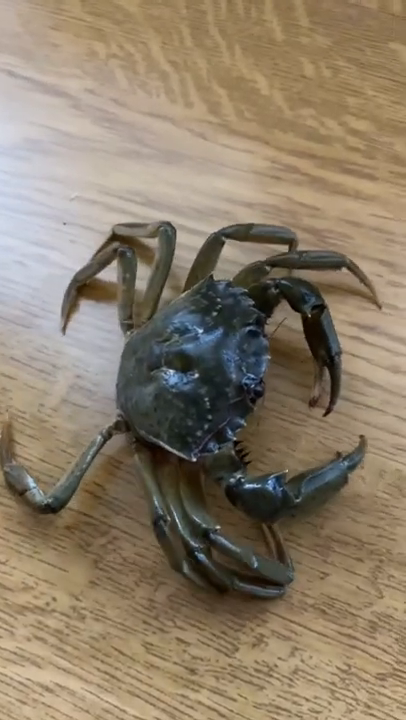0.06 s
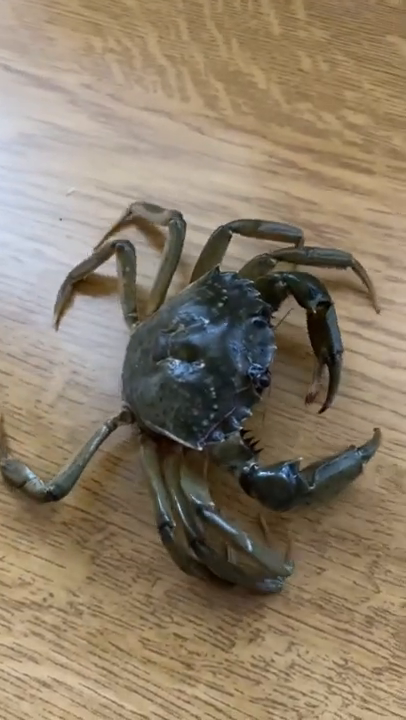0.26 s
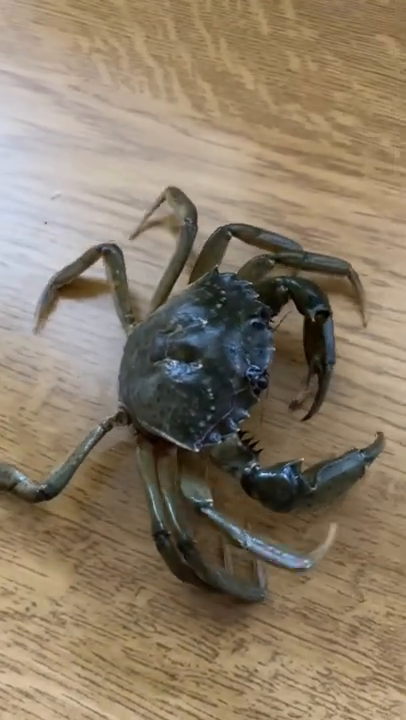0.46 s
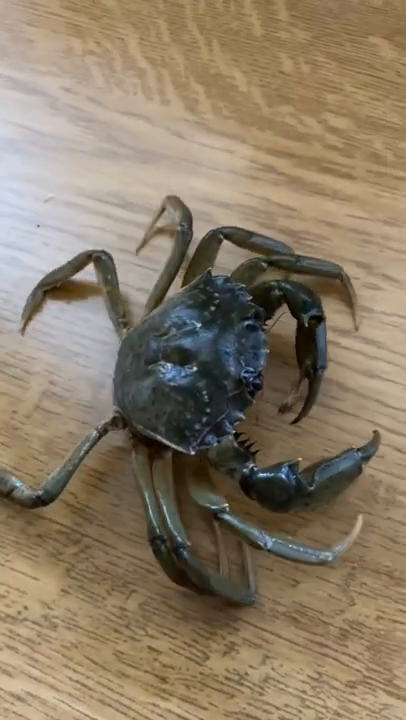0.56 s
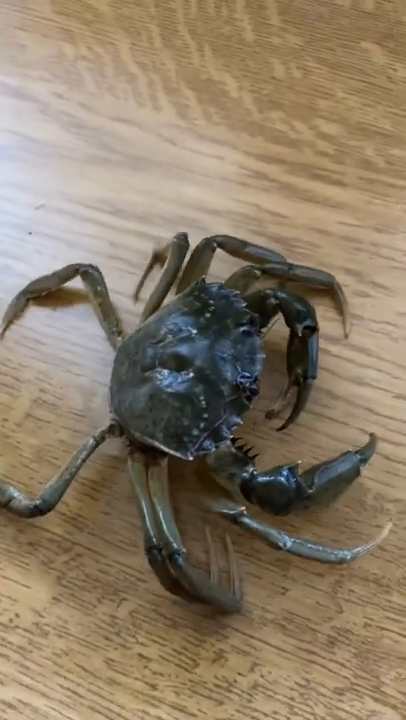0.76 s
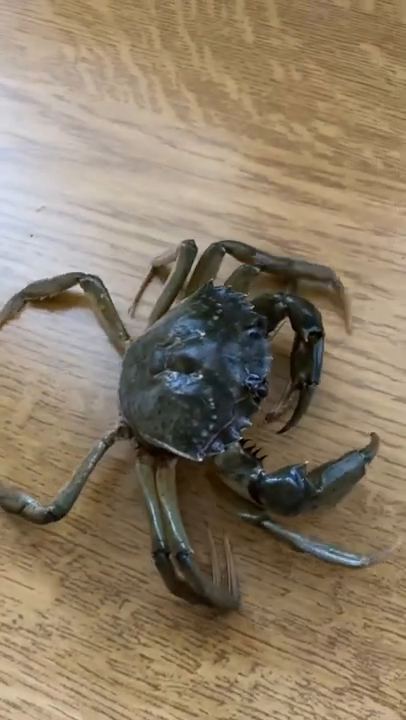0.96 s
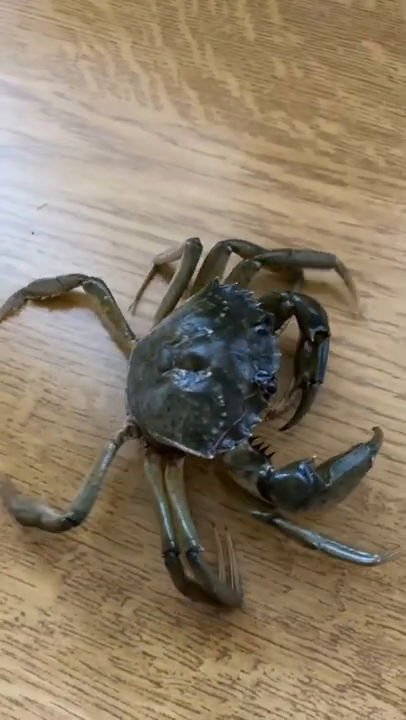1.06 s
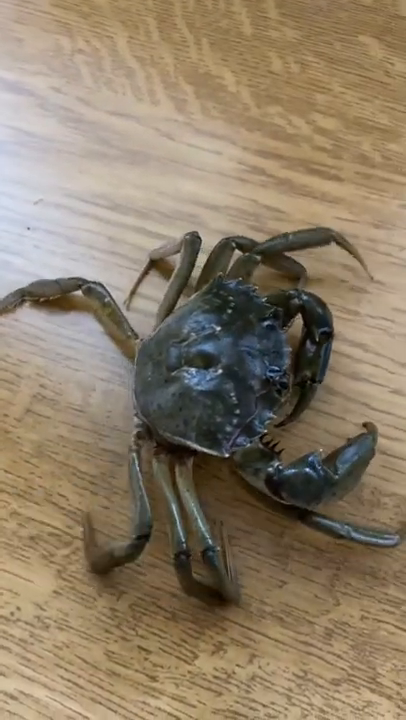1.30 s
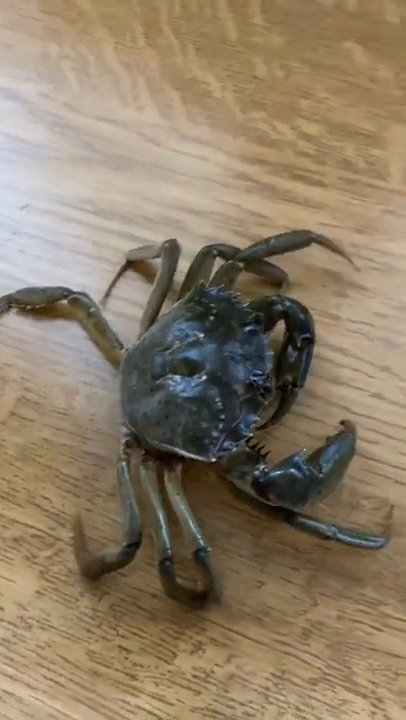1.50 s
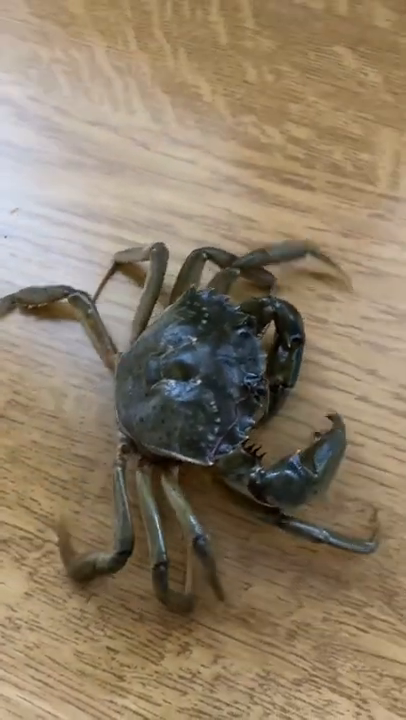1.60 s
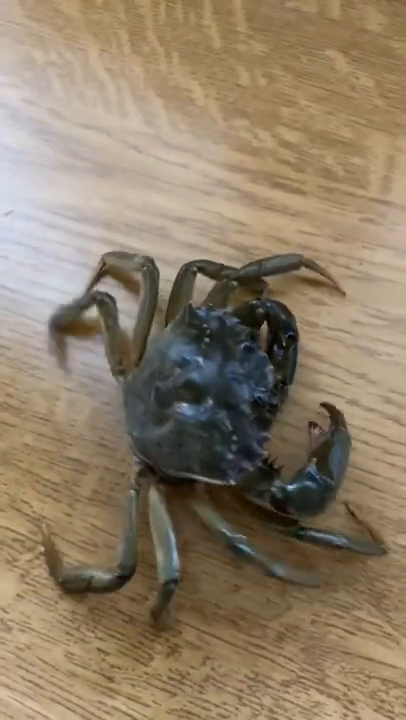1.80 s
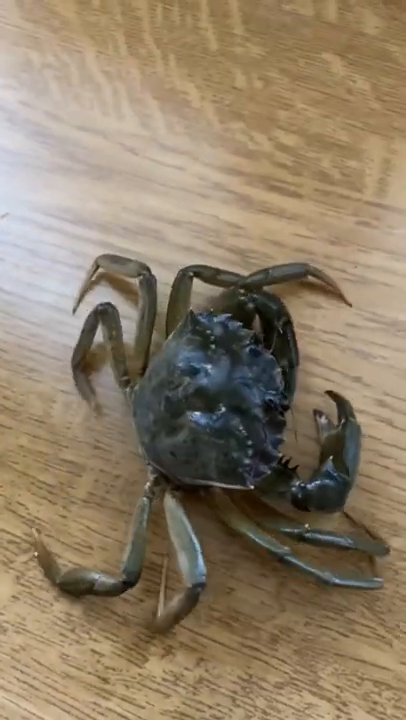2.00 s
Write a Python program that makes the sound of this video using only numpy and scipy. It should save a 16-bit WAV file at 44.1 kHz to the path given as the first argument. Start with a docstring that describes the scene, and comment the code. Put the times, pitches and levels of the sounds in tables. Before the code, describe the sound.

A crab's legs scrape over a wooden table, then brush lightly with soft knocks.

```python
"""One long scrape, swelling twice: a crab drags its legs over a wooden table, close by, in a quiet room.
Dense tiny slips rasp on the grain and set the board booming; the sharp leg tips scratch and hiss.
The body knocks softly and the board shudders under its weight. Then single legs brush and skid
over a faint rustle, with a few more knocks and two tiny shell clicks. A low room drone runs throughout."""
import sys
import numpy as np
from scipy import signal
from scipy.fft import rfft, irfft
from scipy.io import wavfile

SR = 44100
rng = np.random.default_rng(int(sys.argv[2]) if len(sys.argv) > 2 else 0)


def materialize(psi):
    """Save the field psi as 16-bit PCM at rate SR to the path in sys.argv[1].

    A 1-D psi becomes a single channel; in a 2-D psi each row is a channel.
    """
    bounded = np.clip(np.atleast_2d(psi).T, -1, 1)
    quanta = np.round(bounded * 32767).astype(np.int16)
    wavfile.write(sys.argv[1], SR, quanta)


N = 90404
T = np.arange(N) / SR
HZ = np.maximum(np.arange(N // 2 + 1) * SR / N, 1)
SIDE = np.array([[.5], [-.5]])  # left, right

# envelopes of board boom, grain rasp, tip scratch, tip hiss, leg rustle: t/s, level/dB
BOOM_ENVELOPE = [(0.0, -49.5), (0.042, -56.5), (0.066, -68), (0.152, -43), (0.202, -53.5), (0.236, -36),
                 (0.286, -36.5), (0.31, -55.5), (0.388, -41.5), (0.414, -35.5), (0.5, -26.5), (0.536, -29),
                 (0.56, -36), (0.654, -47.5), (0.674, -52.5), (0.726, -48), (0.808, -54.5), (0.85, -95)]
RASP_ENVELOPE = [(0.0, -51), (0.084, -57), (0.136, -48.5), (0.22, -48), (0.236, -40), (0.322, -43),
                 (0.396, -40), (0.444, -28.5), (0.464, -31.5), (0.494, -29.5), (0.586, -38.5),
                 (0.626, -50.5), (0.762, -56.5), (0.832, -72)]
SCRATCH_ENVELOPE = [(0.0, -53.5), (0.082, -61.5), (0.126, -44.5), (0.186, -49), (0.226, -44.5),
                    (0.422, -39), (0.444, -35.5), (0.46, -42.5), (0.5, -30), (0.608, -56), (0.646, -47),
                    (0.686, -58), (0.762, -63), (0.85, -81)]
HISS_ENVELOPE = [(0.0, -61.5), (0.074, -66.5), (0.124, -49.5), (0.216, -47.5), (0.242, -42), (0.474, -45.5),
                 (0.5, -41.5), (0.62, -59.5), (0.65, -64)]
RUSTLE_ENVELOPE = [(0.8, -56), (0.866, -57.5), (1.018, -53), (1.212, -60), (1.39, -63.5), (1.678, -63),
                   (2.05, -65.5)]
# spectral shapes of the rubbing sounds and the room drone: f/Hz, level/dB
RASP_SPECTRUM = [(250, -1), (420, -2), (550, 4), (680, 0.5), (1000, -0.5), (1500, -4), (2000, -9),
                 (2800, -9)]
SCRATCH_SPECTRUM = [(1300, -8.5), (2100, 0.5), (3000, 0.5), (4200, -2), (5400, -6), (6500, -8.5),
                    (8500, -10.5)]
HISS_SPECTRUM = [(5500, -1), (7000, -11.5), (8500, -2), (11000, 0.5), (13000, -1), (14200, -10),
                 (15000, -14), (15700, -9.5)]
BRUSH_SPECTRUM = [(200, -17.5), (520, 6), (1400, 5), (2500, -1.5), (5500, -7), (8000, -8.5), (12000, -17.5),
                  (13800, -14), (15000, -47)]
SKID_SPECTRUM = [(2000, -29), (2640, -4), (3200, -14), (3940, -3), (4500, -5), (5070, -0.5), (7000, -6),
                 (8500, -1), (9200, -6), (10000, -10), (11200, -2), (12200, -6), (13200, -15), (15700, -18)]
RUSTLE_SPECTRUM = [(450, -1.5), (900, -1.5), (1130, -8), (1430, 3), (1750, -6.5), (2050, -6.5), (2240, 3),
                   (2450, -4), (3100, -7.5), (5500, -8), (8000, -18), (12500, -19), (14000, -36),
                   (15000, -38)]
DRONE_SPECTRUM = [(15, -41), (25, -1.5), (81, -5), (98, 2), (151, -0.5), (207, -2), (233, -12), (271, -3),
                  (297, -9), (479, -20.5), (900, -37.5), (1170, -54), (1980, -120)]
# modes of the booming board: f/Hz, gain/dB, width/Hz
BOOM_MODES = [(84, -9, 14), (110, -6, 14), (144, 3, 10), (166, 0, 10), (202, 1, 16), (285, -7, 16),
              (330, -11, 25), (359, -4, 10)]
# narrow peaks that colour the scraping and the drone: f/Hz, gain/dB, width/Hz
SCRAPE_PEAKS = [(432, 4, 12), (482, 9, 13), (526, 7, 12), (562, 6, 14), (744, 7, 13), (836, 6.5, 13),
                (923, 6, 13), (1088, 6, 14), (1420, 2, 50), (1540, 2, 40), (1880, 3.5, 20), (2229, 4.5, 36),
                (2621, 7, 26)]
DRONE_PEAKS = [(144.6, 4, 31), (174, -4.5, 3.7), (187.6, 3, 7.4)]
# dulling of the tip hiss: t/s, low-passed share/1
HISS_DULLING = [(0.33, 0.1), (0.44, 0.4), (0.47, 1)]
# body knocks: t/s, level/dB, contact/s
BODY_KNOCKS = [(0.233, -36, 0.004), (0.246, -22.5, 0.0065), (0.303, -38, 0.01), (0.494, -26.5, 0.0026),
               (0.531, -22, 0.0064), (1.83, -33.5, 0.0044), (1.851, -40.5, 0.0065), (1.873, -42, 0.0047)]
# modes of the knocked table: f/Hz, level/dB, t60/s
TABLE_MODES = [(46.8, -11.5, 0.22), (97, -3.5, 0.06), (123.6, -0.5, 0.11), (196.6, -1.5, 0.24),
               (323, -3, 0.089), (380, -8, 0.17)]
# board shudders: t/s, level/dB, hold/s, fall/(dB/s), centre/Hz, width/oct
SHUDDERS = [(0.239, -34, 0.026, 148, 74, 1.06), (0.318, -43.5, 0.015, 200, 50, 0.42),
            (0.437, -56, 0.023, 153, 65.4, 0.5), (0.534, -31, 0.029, 187, 60.5, 0.89),
            (1.426, -54.5, 0.012, 165, 477, 0.35), (1.497, -48.5, 0.016, 222, 164, 0.44),
            (1.814, -56.5, 0.025, 232, 360, 0.33)]
# strokes of single legs: t/s, level/dB, hold/s, fall/(dB/s), tilt/(dB/oct)
LEG_BRUSHES = [(0.636, -49.5, 0.0081, 298, -3), (0.699, -51.5, 0.024, 162, -1),
               (0.904, -59.5, 0.012, 162, 3.5), (0.995, -68, 0.27, 171, -9.5),
               (1.149, -65, 0.0066, 330, -1), (1.249, -46, 0.006, 215, -1), (1.33, -52.5, 0.011, 135, -2.2),
               (1.489, -68.5, 0.03, 163, 1.5), (1.618, -62.5, 0.036, 225, -1), (1.714, -63, 0.006, 268, -4),
               (1.809, -61, 0.015, 203, 1), (1.889, -59.5, 0.0046, 171, 0.5), (1.95, -63, 0.017, 198, 0)]
TIP_SKIDS = [(0.669, -45.5, 0.0052, 750, 8), (0.685, -56.5, 0.01, 191, 8), (0.735, -54, 0.012, 298, -6.5),
             (1.249, -59, 0.005, 500, -7), (1.717, -64.5, 0.004, 550, -15), (2.026, -67, 0.015, 200, -8)]
# shell clicks: t/s, level/dB, starting pitch/Hz
SHELL_CLICKS = [(1.8837, -39, 14800), (1.9289, -42, 10500)]
# stereo width, as how alike left and right sound: f/Hz, likeness/1
STEREO_LIKENESS = [(110, 1), (250, 0.83), (600, 0.52), (1100, 0.59), (1900, 0.78), (3000, 0.62),
                   (4600, 0.7), (6000, 0.67), (6900, 1), (7900, 1), (9000, 0.55), (10400, 1), (12000, 0.92),
                   (12900, .99), (14500, 1)]
# stereo balance of crab and room: f/Hz, left minus right/dB
CRAB_BALANCE = [(60, -1), (110, -2.5), (200, -2), (380, -10), (700, -2.5), (1290, -0.5), (2380, 1),
                (4400, 0.0), (8120, 0.0), (15000, 0.0)]
ROOM_BALANCE = [(60, -0.5), (180, -3), (550, -4), (1650, -9), (4970, -3.5), (15000, -9)]
# left-right phase, spreading the sound in stereo: f/Hz, left lead/rad
STEREO_PHASE = [(350, -.1), (1000, 1.1), (1650, .1), (2300, 1.1), (4300, .7), (5100, .3), (5900, 1.1),
                (6800, 3.1), (8000, 3.2), (9700, 6.1), (11300, 6.5), (12800, 9.35), (14800, 9.5),
                (15300, 12.5)]

SCRAPE_SLIPS_PER_S, BRUSH_SLIPS_PER_S, SKID_SLIPS_PER_S = 9000, 5000, 5800


def from_db(db):
    """Amplitude from dB."""
    return 10 ** (np.asarray(db) / 20)


def rms_one(x):
    """Stereo pair scaled to mid rms 1."""
    return x / np.sqrt(np.mean(x.mean(axis=0) ** 2) + 1e-20)


def at_hz(points):
    """Table interpolated over log frequency."""
    hz, value = np.transpose(points)
    return np.interp(np.log(HZ), np.log(hz), value)


def spectrum_db(points):
    """Spectral shape, falling 20 dB/oct beyond its ends."""
    outside_oct = np.maximum(np.log2(points[0][0] / HZ), 0) + np.maximum(np.log2(HZ / points[-1][0]), 0)
    return at_hz(points) - 20 * outside_oct


def peaks_db(rows):
    """Summed gain of narrow peaks."""
    return sum(db / (1 + (2 * (HZ - hz) / width_hz) ** 2) for hz, db, width_hz in rows)


def level(rows, trim_db, release_db_per_s=160):
    """Gain along an envelope table, dying away outside it."""
    t_s, db = np.transpose(rows)
    outside_s = np.maximum(T - t_s[-1], 0) + np.maximum(t_s[0] - T, 0)
    return from_db(np.interp(T, t_s, db) + trim_db - release_db_per_s * outside_s)


def stroke(texture, t_s, attack_s, hold_s, fall_db_per_s):
    """Texture that rises until t_s, holds and decays; scaled to the envelope's rms."""
    rise = np.clip((T - t_s) / attack_s + 1, 0, 1) ** 2
    envelope = rise * from_db(-fall_db_per_s * np.maximum(T - t_s - hold_s, 0))
    return rms_one(texture * envelope) * np.sqrt(np.mean(envelope ** 2))


def wander(steps):
    """Random curve, spread about 1, new value each whole step."""
    return np.interp(steps, np.arange(N), rng.standard_normal(N))


def stereo_mix(sources, gain_db, balance):
    """One shared and two separate signals, filtered and mixed to left and right; rms 1."""
    spectra = rfft(sources)
    likeness = np.clip(at_hz(STEREO_LIKENESS), 0, .998)
    shared = np.sqrt(likeness) * spectra[0] * np.exp(1j * SIDE * at_hz(STEREO_PHASE))
    separate = np.sqrt(1 - likeness) * spectra[1:]
    return rms_one(irfft((shared + separate) * from_db(gain_db + SIDE * at_hz(balance)), N))


def placed(x):
    """Mono signal from the crab, placed in stereo."""
    response = from_db(SIDE * at_hz(CRAB_BALANCE)) * np.exp(1j * SIDE * at_hz(STEREO_PHASE))
    return irfft(rfft(x) * response, N)


def friction(gain_db, slips_per_s=SCRAPE_SLIPS_PER_S):
    """Tiny uneven slips in juddering clumps, coloured by narrow peaks and a fine random ripple."""
    spread_db, judder_db, judder_per_s = 3, 1.22, 83
    depth_db, ripple_width_hz, ripple_full_hz = 3.5, 35, 1440
    sizes = from_db(spread_db * np.minimum(rng.exponential(1, (3, N)), 4))
    signs = rng.choice([-1, 1], (3, N))
    slipping = rng.random((3, N)) < slips_per_s / SR
    judder = from_db(judder_db * wander(T * judder_per_s))
    ripple_db = depth_db * wander(HZ / ripple_width_hz) * np.minimum(HZ / ripple_full_hz, 1)
    slips = sizes * signs * slipping * judder
    return stereo_mix(slips, gain_db + peaks_db(SCRAPE_PEAKS) + ripple_db, CRAB_BALANCE)


def long_scrape():
    """Dragging legs: the board booms, the grain rasps, the tips scratch and hiss."""
    board_power = sum(from_db(db) ** 2 / (1 + ((HZ ** 2 - hz ** 2) / (HZ * width_hz)) ** 2)
                      for hz, db, width_hz in BOOM_MODES)
    boom = level(BOOM_ENVELOPE, trim_db=0.5) * friction(10 * np.log10(board_power))
    rasp = level(RASP_ENVELOPE, trim_db=-1.5) * friction(spectrum_db(RASP_SPECTRUM))
    scratch = level(SCRATCH_ENVELOPE, trim_db=-0.5) * friction(spectrum_db(SCRATCH_SPECTRUM))
    return boom + rasp + scratch + tip_hiss()


def tip_hiss(dull_hz=12300):
    """Leg tips hiss, losing their top as the crab bears down."""
    bright = friction(spectrum_db(HISS_SPECTRUM))
    dull = irfft(rfft(bright) / np.sqrt(1 + (HZ / dull_hz) ** 16), N)
    share = np.interp(T, *np.transpose(HISS_DULLING))
    return level(HISS_ENVELOPE, trim_db=0.5) * ((1 - share) * bright + share * dull)


def room_noise(drone_db=-51.5, air_db=-75):
    """Steady low drone with a trace of hiss."""
    drone_shape_db = spectrum_db(DRONE_SPECTRUM) + peaks_db(DRONE_PEAKS)
    drone = stereo_mix(rng.standard_normal((3, N)), drone_shape_db, ROOM_BALANCE)
    air = stereo_mix(rng.standard_normal((3, N)), spectrum_db(RUSTLE_SPECTRUM), ROOM_BALANCE)
    return from_db(drone_db) * drone + from_db(air_db) * air


def body_knocks():
    """The body drops on the table; longer contact, weaker high modes."""
    out = np.zeros(N)
    for t_s, db, contact_s in BODY_KNOCKS:
        age_s = np.maximum(T - t_s, 0)
        rise = 1 - np.exp(-2 * age_s / contact_s)
        for hz, mode_db, t60_s in TABLE_MODES:
            softening = 1 / np.sqrt(1 + (hz * contact_s) ** 4)
            decay = from_db(db + mode_db - 60 * age_s / t60_s)
            out += softening * rise * decay * np.sin(2 * np.pi * hz * age_s)
    return placed(out)


def board_shudders(attack_s=.016):
    """The board shudders under the crab's weight: dull bursts of band-limited friction."""
    out = 0
    for t_s, db, hold_s, fall_db_per_s, centre_hz, width_oct in SHUDDERS:
        band_db = -20 * np.log10(1 + .5 * (np.log2(HZ / centre_hz) / width_oct) ** 4)
        out += from_db(db) * stroke(friction(band_db), t_s, attack_s, hold_s, fall_db_per_s)
    return out


def leg_touches(brush_attack_s=.009, skid_attack_s=.0055):
    """Single legs brush and ringing tips skid over a faint rustle; sparser slips than the scrape."""
    rustle = friction(spectrum_db(RUSTLE_SPECTRUM), BRUSH_SLIPS_PER_S)
    out = level(RUSTLE_ENVELOPE, trim_db=-5.5) * rustle
    brushes = (LEG_BRUSHES, BRUSH_SPECTRUM, BRUSH_SLIPS_PER_S, brush_attack_s)
    skids = (TIP_SKIDS, SKID_SPECTRUM, SKID_SLIPS_PER_S, skid_attack_s)
    for rows, spectrum, slips_per_s, attack_s in (brushes, skids):
        for t_s, db, hold_s, fall_db_per_s, tilt_db_per_oct in rows:
            texture = friction(spectrum_db(spectrum) + tilt_db_per_oct * np.log2(HZ), slips_per_s)
            out += from_db(db) * stroke(texture, t_s, attack_s, hold_s, fall_db_per_s)
    return out


def shell_clicks(ring_hz=5800, width_hz=1600, settle_s=86e-6, echo_s=.0024, echo_db=-15):
    """Shell clicks: pitch drops at once to a 1 ms ring; one weak echo each."""
    out = np.zeros(N)
    for t_s, db, start_hz in SHELL_CLICKS:
        for delay_s, gain_db in ((0, 0), (echo_s, echo_db)):
            age_s = np.maximum(T - t_s - delay_s, 0)
            swell = np.pi * width_hz * age_s / 2
            envelope = (swell * np.exp(1 - swell)) ** 2
            cycles = ring_hz * age_s + (start_hz - ring_hz) * settle_s * (1 - np.exp(-age_s / settle_s))
            out += from_db(db + gain_db) * envelope * np.sin(2 * np.pi * cycles)
    return placed(out)


def scene():
    """Crab on the table plus room, stereo."""
    return long_scrape() + leg_touches() + board_shudders() + body_knocks() + shell_clicks() + room_noise()


def record(dry, low_cut_hz=33.5, stopband_hz=16600):
    """Microphone: deepest bass lost, top cut steeply."""
    highpass = signal.butter(4, low_cut_hz, "high", fs=SR, output="sos")
    lowpass = signal.cheby2(16, 70, stopband_hz, fs=SR, output="sos")
    return signal.sosfilt(lowpass, signal.sosfilt(highpass, dry))


dry = scene()
out = record(dry)
materialize(out)
```